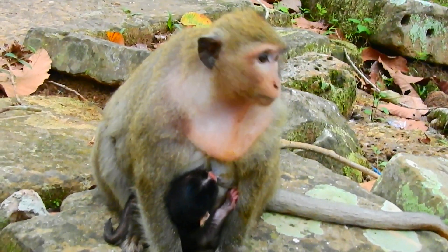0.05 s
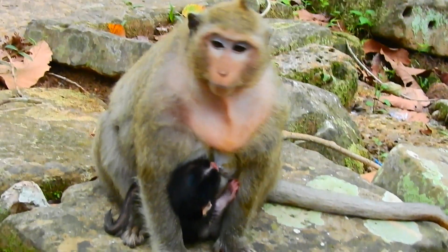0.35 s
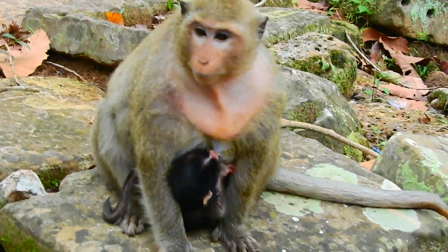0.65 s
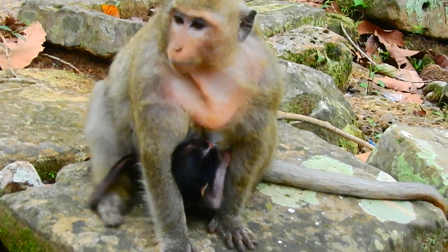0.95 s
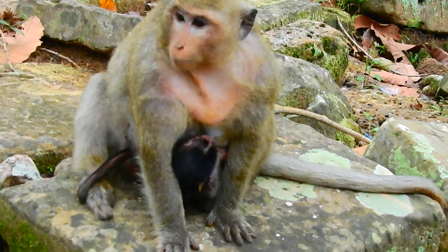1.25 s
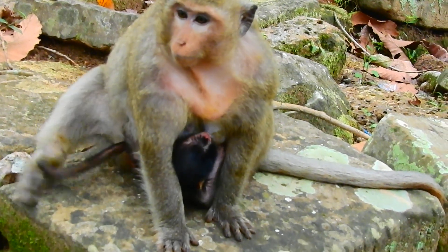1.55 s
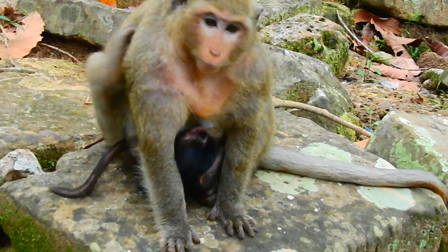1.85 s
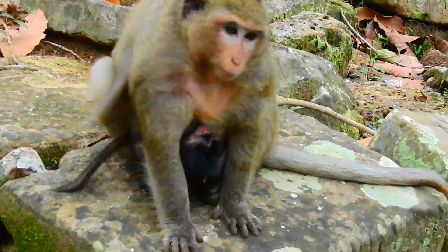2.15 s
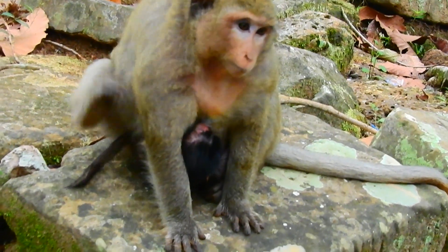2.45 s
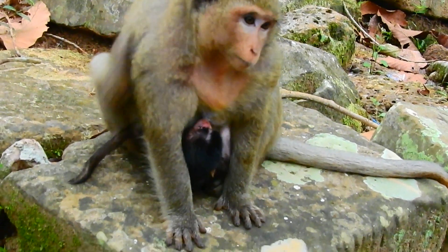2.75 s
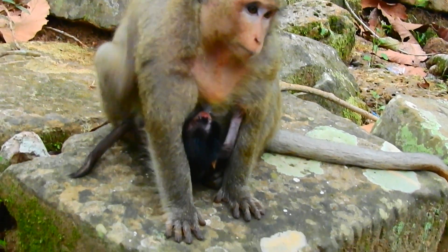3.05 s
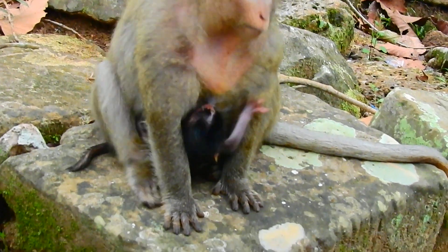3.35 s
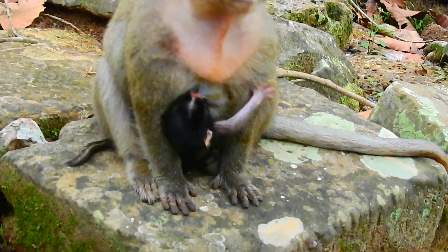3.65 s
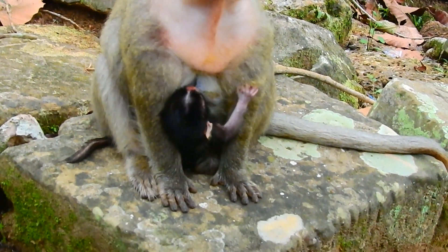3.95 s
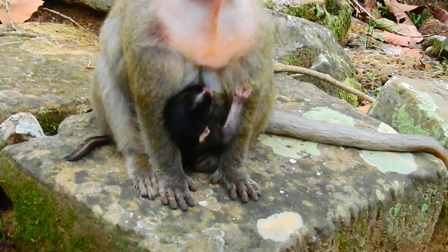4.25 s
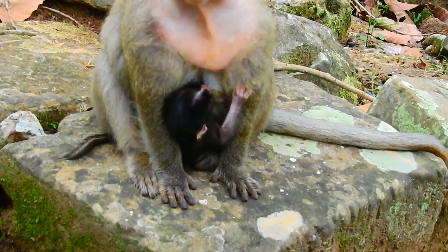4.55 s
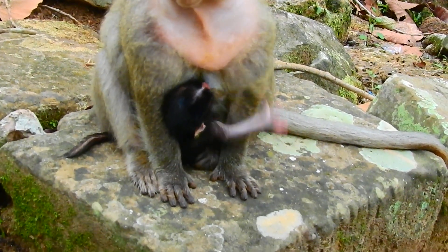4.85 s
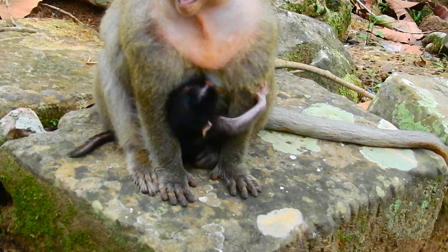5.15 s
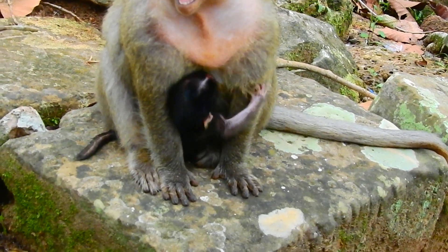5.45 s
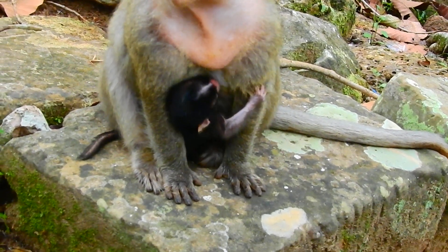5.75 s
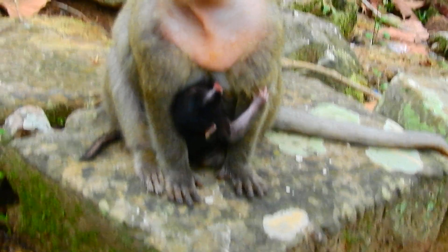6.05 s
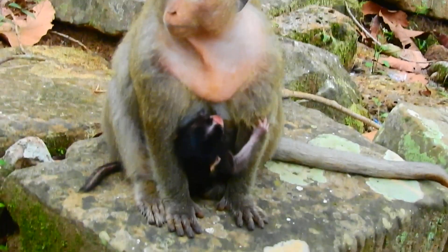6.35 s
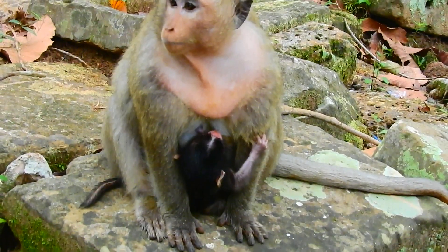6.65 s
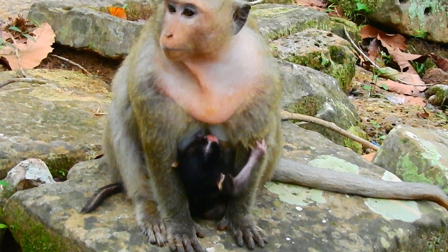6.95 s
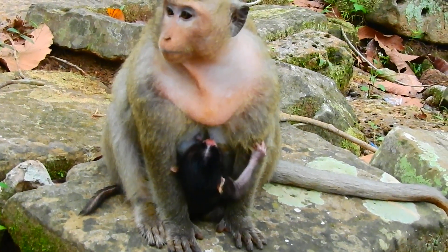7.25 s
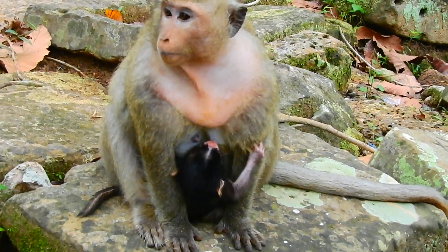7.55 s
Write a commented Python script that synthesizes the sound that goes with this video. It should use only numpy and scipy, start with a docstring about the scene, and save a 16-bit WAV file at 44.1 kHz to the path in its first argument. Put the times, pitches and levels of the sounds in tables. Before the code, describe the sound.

Close by, a baby macaque coos softly and then lets out a long, piercing scream that cracks in pitch and ends raspy. It coos again between a few dull thuds and scuffs of its mother's feet on stone, and finishes with one brief, rough squeak. All around is outdoor forest ambience: a constant high insect hiss, faint rumbling air and occasional thin whistles from a faraway bird.

```python
"""Forest air rumbles and insects hiss throughout; a far bird whistles and a mother macaque steps on rock.
At 4 s the baby in her arms coos softly through pursed lips. Near 5 s it gives one long shrill scream, which
breaks between registers and collapses into a rasp at 5.7 s; an automatic gain control ducks under it.
More coos, steps and whistles follow, and at 7.6 s a short harsh squeak comes through the wide-open mouth."""
import sys
import numpy as np
from scipy import signal
from scipy.fft import rfft, irfft, next_fast_len
from scipy.io import wavfile
from scipy.ndimage import minimum_filter1d, map_coordinates

SR = 44100
rng = np.random.default_rng(int(sys.argv[2]) if len(sys.argv) > 2 else 0)


def inscribe(sig):
    """Save sig as 16-bit PCM at rate SR to the path in sys.argv[1].

    A 1-D sig is mono; a 2-D sig holds one channel per row.
    Samples are clipped to [-1, 1] before scaling.
    """
    pcm = np.round(np.clip(np.atleast_2d(sig).T, -1, 1) * 32767)
    wavfile.write(sys.argv[1], SR, pcm.astype(np.int16))


N = 344850
TIME = np.arange(N) / SR

# Noise spectra of the background. Each row: frequency in Hz, relative spectral density in dB.
AIR_SPECTRUM = [(22, -44), (32, -35), (45, -9.5), (62, -6.5), (100, 2), (160, -2.5), (200, -9.5),
                (280, -15.5), (400, -29), (650, -26.5), (1300, -30.2), (1900, -29.2), (2500, -32),
                (4200, -87)]
FAR_CALLS_SPECTRUM = [(900, 4.5), (1800, -6), (2400, -0.5), (2800, 2), (3220, 8), (3650, -18.5),
                      (5000, -28.5)]  # faint distant calls near 3 kHz over a soft forest hush
INSECT_SPECTRUM = [(2060, -52.5), (3500, -10.5), (3700, -14.5), (4090, -2.5), (4430, -2.5), (4810, 3.5),
                   (5150, 1.5), (5510, -1.5), (5870, -8.5), (6280, -8), (6770, -14.5), (7910, -25),
                   (8580, -27.5), (10400, -35), (15500, -44)]
CRICKET_SPECTRUM = [(3900, -62), (4170, 0), (4280, 4), (4550, -60)]
# Slow drift of the insect chorus. Each row: time in seconds, level in dB.
CHORUS_LEVEL = [(0, -41.5), (2.3, -42), (2.8, -41), (3.8, -41), (4.4, -41.5), (6.2, -42), (7.0, -39.5),
                (7.8, -40.5)]
# Width of the background. Each row: frequency in Hz, side against mid in dB.
STEREO_WIDTH = [(60, -26), (150, -24), (380, -12.5), (950, -11), (2380, -10), (5980, -3.5), (15000, 3.5)]
# Reverberation of the forest. Each row: frequency in Hz, time to decay by 60 dB in seconds.
FOREST_DECAY = [(200, .35), (2200, 0.56), (5000, 0.59), (10000, 0.42), (15000, 0.19)]
# Level difference of the monkeys' sounds. Each row: frequency in Hz, left minus right in dB.
EAR_DIFFERENCE = [(1000, 0), (2200, .3), (5000, .3), (9000, -2), (13000, -.2)]
# The far bird's notes. Each row: start in seconds, hold in seconds, pitch in Hz, level in dB.
BIRD_NOTES = [(.2, .11, 2200, -52), (.47, .2, 2175, -49.5), (1.1, .22, 2100, -54), (1.42, .2, 2120, -53.5),
              (2.632, .06, 2212, -39), (2.855, .17, 2205, -37.5), (4.24, .39, 2205, -52.5),
              (4.7, .12, 2220, -48.5), (6.643, .36, 2190, -43.5), (6.873, .3, 2232, -40.5),
              (7.42, .18, 2244, -47)]
# The mother's steps, taps and scratches. Each row: start and length in seconds, thud and scuff in dB.
FOOTFALLS = [(.915, .06, -49, -41.5), (1.302, 0.057, -32.5, -56), (2.189, .08, -57, -54),
             (2.44, .05, -60, -56), (3.661, .024, -59, -41), (6.816, 0.0063, -45, -26.5),
             (6.863, 0.03, -24, -47), (7.053, 0.013, -40, -31.5), (7.568, 0.013, -57, -37.5)]
# Spectra of impact and friction on rock. Each row: frequency in Hz, relative level in dB.
THUD_SPECTRUM = [(60, -14), (150, -1.5), (280, 5), (450, -12), (1200, -58)]
SCUFF_SPECTRUM = [(300, -11), (800, 3.5), (1600, -2.5), (3000, -8.5), (6500, -22), (10000, -33),
                  (14000, -42)]
# Coos and peeps. Each row: start and length in seconds, pitch in Hz, glide as a share of the pitch,
# level in dB, overtone gain in dB.
COO_CALLS = [(4.012, .14, 557, 0, -42, -12), (4.569, .033, 554, .06, -23.5, -3),
             (4.588, .041, 587, .02, -19.5, -5.5), (4.663, .053, 523, 0, -31, -1),
             (4.739, .039, 3510, .027, -33, -14), (4.814, .02, 580, .11, -31, -7),
             (4.86, .014, 1223, .13, -34.5, -8), (5.52, .095, 3520, 0, -35, -14),
             (5.979, .088, 685, -.04, -41.5, 0), (6.559, .085, 685, -.023, -37.5, 0),
             (6.788, .043, 560, .22, -26, 1.5), (6.859, .085, 514, -.015, -30, 3.5),
             (7.634, .019, 3560, .09, -31.5, -14), (7.69, .013, 3220, -.01, -19, -11)]
# Spectral envelopes of the voice. Each row: frequency in Hz, relative level in dB.
PURSED_LIPS = [(1100, -22), (1700, -17), (2300, -30), (3100, -22.5), (4000, -32), (6900, -12.5),
               (9300, -33.5), (11500, -52), (15000, -68)]
OPEN_MOUTH = [(450, -34), (900, -24.5), (2100, -10.5), (2700, -6), (3300, -5), (4700, -4), (5500, 5),
              (6700, 2.5), (8000, -11.5), (9700, -21), (12000, -32.5), (15500, -48)]
SCREAM_OVERTONES = [(7400, 2), (8300, -9.5), (8900, -6.5), (9250, -12), (9550, -23.5), (10600, -25),
                    (11800, -39), (13300, -29), (14300, -44), (15800, -46)]
SCREAM_HALF_ORDERS = [(6300, 18.5), (6900, -13), (7900, -3), (11000, -24), (14000, -34)]
SCREAM_RASP = [(500, -47), (1700, -25), (2200, -4.5), (2800, -16), (3700, -20), (4500, -10), (5500, 5),
               (6600, 3.5), (7800, -5), (9200, -13), (11000, -15.5), (13500, -24), (15500, -39)]
SCREAM_SQUEAL = [(4600, -40), (5400, 0), (5900, 0), (6600, -12), (7600, -36)]
# The squeak's two pushes. Each row: peak and hold in seconds, level in dB, rise and fall in dB a second.
SQUEAK_PUSHES = [(7.684, .026, -14.5, 430, 1400), (7.735, .006, -23, 300, 550)]
# The whistle over the squeak. Each row: time in seconds, pitch in Hz.
SQUEAK_ARCH = [(7.646, 940), (7.662, 1060), (7.666, 1540), (7.674, 1590), (7.701, 2250), (7.719, 1420)]
# The scream's upper register. Each row: time in seconds, pitch in Hz, effort in dB.
SCREAM_ARCH = [(4.928, 3680, -34), (4.98, 4770, -19.5), (5.03, 4950, -7.5), (5.052, 4830, -3),
               (5.088, 5060, -2), (5.155, 4690, -2.5), (5.187, 4900, -4), (5.335, 4560, -8),
               (5.417, 4740, -7), (5.43, 5250, 1), (5.485, 5540, 2), (5.56, 5590, 1.5), (5.63, 5150, -1),
               (5.685, 4730, -3), (5.7, 4450, -8)]
# Breaks to the lower register. Each row: start and length in seconds, drop as a share of the pitch,
# recovery rate per second, half-order gain in dB.
REGISTER_BREAKS = [(4.995, .033, .11, 9, 0), (5.057, .023, .125, 6, 4), (5.096, .028, .135, 16, -5),
                   (5.207, .025, .07, 16, -35), (5.25, .043, .073, 9, -7), (5.39, .031, .068, 12, -10),
                   (5.452, .03, .085, 42, -35), (5.494, .037, .07, 8, -15), (5.552, .023, .075, 45, -30),
                   (5.59, .03, .055, 35, -12)]
# Bursts of strain in the scream. Each row: centre and half width in seconds, rasp level in dB.
STRAIN_BURSTS = [(5.008, .013, -28), (5.052, .005, -21), (5.201, .008, -23), (5.255, .01, -22),
                 (5.317, .01, -27), (5.378, .015, -18), (5.417, .006, -24), (5.496, .008, -15),
                 (5.604, .017, -10)]

TOP_HZ = 15720  # upper band limit


def amp(db):
    """Decibels as an amplitude ratio."""
    return 10 ** (np.asarray(db) / 20)


def unit(x):
    """Normalisation to an rms of 1."""
    return x / np.sqrt(np.mean(x ** 2) + 1e-20)


def along(points, hz):
    """Interpolation of (Hz, value) points on a logarithmic frequency axis."""
    freqs, values = np.transpose(points)
    return np.interp(np.log(hz + 1), np.log(freqs + 1), values)


def curves(rows, t):
    """Linear interpolation of each column after the time, at the times t."""
    times, *columns = np.transpose(rows)
    return [np.interp(t, times, column) for column in columns]


def span(start, end):
    """The sample times between two moments."""
    return TIME[int(start * SR):int(end * SR)]


def add(track, t, x):
    """Superposition of x on the track at the times t."""
    track[round(t[0] * SR):][:len(x)] += x


def gate(t, start, end, edge):
    """A trapezoidal window from start to end."""
    return np.clip((t - start) / edge + .5, 0, 1) * np.clip((end - t) / edge + .5, 0, 1)


def envelope_db(t, peak, held, db, rise, fall):
    """Exponential attack and release around a hold; rise and fall are in dB a second."""
    return db - rise * np.maximum(peak - t, 0) - fall * np.maximum(t - peak - held, 0)


def wobble(t, rate):
    """Random modulation: a spline through rate Gaussian knots a second."""
    knots = (t - t[0]) * rate
    return map_coordinates(rng.standard_normal(int(knots[-1]) + 4), [knots])


def phase_of(hz):
    """Phase in radians, the integral of frequency."""
    return 2 * np.pi * np.cumsum(hz) / SR


def filtered(x, response):
    """Linear filtering: the spectrum of x times a frequency response."""
    n = x.shape[-1]
    padded = next_fast_len(n + 8192)
    return irfft(rfft(x, padded) * response(np.fft.rfftfreq(padded, 1 / SR)), padded)[..., :n]


def smoothed(x, time_constant_s):
    """Exponential averaging by a one-pole low-pass."""
    pole = np.exp(-1 / (time_constant_s * SR))
    return signal.lfilter([1 - pole], [1, -pole], x)


def noise(t, spectrum):
    """White noise shaped to a spectrum, with an rms of 1."""
    return unit(filtered(rng.standard_normal(len(t)), lambda hz: amp(along(spectrum, hz))))


def diffuse(spectrum):
    """A diffuse field: noise that is coherent between the ears in the bass and less so above."""
    mid = noise(TIME, spectrum)
    side = filtered(noise(TIME, spectrum), lambda hz: amp(along(STEREO_WIDTH, hz)))
    return np.array([mid + side, mid - side])


def background():
    """Amplitude-modulated noise: rumbling air, faint distant calls, an insect chorus, a nearer cricket."""
    rumble = amp(-35.0 + 0.64 * wobble(TIME, 8.2)) * diffuse(AIR_SPECTRUM)
    far_calls = amp(-52.5 + 1.05 * wobble(TIME, 6)) * diffuse(FAR_CALLS_SPECTRUM)
    chorus_db, = curves(CHORUS_LEVEL, TIME)
    insects = amp(chorus_db + 0.46 * wobble(TIME, 11)) * diffuse(INSECT_SPECTRUM)
    cricket = amp(-55.5 + 4.3 * wobble(TIME, 14)) * diffuse(CRICKET_SPECTRUM)
    return rumble + far_calls + insects + cricket


def forest_reverb(x):
    """Scattering from rocks and trunks: convolution with an exponentially decaying noise tail."""
    hz, t, spectra = signal.stft(rng.standard_normal((2, SR * 3 // 4)), SR, nperseg=256)
    decay = amp(-60 * t / along(FOREST_DECAY, hz)[:, None])
    mid, side = signal.istft(spectra * decay, SR, nperseg=256)[1]
    tail = np.array([mid + 0.53 * side, mid - 0.15 * side]) / np.linalg.norm(mid)
    return signal.fftconvolve(x[None], tail, axes=1)[:, :N]


def bird():
    """Multipath propagation: trees smear each far whistle, differently at each ear, and prolong it."""
    out = np.zeros((2, N))
    ring_t60_s = 1.34
    for start, held, pitch, db in BIRD_NOTES:
        t = span(start, start + held + 1)
        age = t - t[0]
        flick = np.exp(-(age / 0.014) ** 2)  # the pitch drops onto its note
        phase = phase_of(pitch * (1 + flick * (0.08 + 0.09 * wobble(t, 1200)) + 0.0041 * wobble(t, 18)))
        rise_s = max(.006 * amp(-1.7 * (db + 40)), .001)  # faint notes arrive as echoes and swell slowly
        level = amp(db + 2.4 * wobble(t, 26) - 60 * np.maximum(age - held, 0) / ring_t60_s)
        level *= 1 - np.exp(-age / rise_s)
        smeared = lambda k: wobble(t, 45) * np.sin(k * phase) + wobble(t, 44.8) * np.cos(k * phase)
        octave = gate(age, 0.024, .2, .05) * amp(db + 33)  # strongest early in loud notes
        mid = 0.88 * np.sin(phase) + 0.55 * smeared(0.98)
        mid += octave * smeared(2) + amp(-26.5) * smeared(3.47)
        side = amp(-9) * smeared(0.95)
        add(out[0], t, amp(1.2) * level * (mid + side))
        add(out[1], t, amp(2.6) * level * (mid - side))
    return out


def steps():
    """Impact and friction: soft feet on rock give a dull thud and a gritty scuff that die quickly."""
    out = np.zeros(N)
    for start, length, thud_db, scuff_db in FOOTFALLS:
        t = span(start, start + .15)
        age = t - t[0]
        envelope = 2 * np.exp(-2 * age / length) * (1 - np.exp(-age / (length / 7)))
        grit = amp(2.3 * wobble(t, 300))
        thud = amp(thud_db) * noise(t, THUD_SPECTRUM)
        scuff = amp(scuff_db) * grit * noise(t, SCUFF_SPECTRUM)
        add(out, t, envelope * (thud + scuff))
    return out


def coos():
    """Source and filter: pursed lips weaken the harmonics, leaving short, nearly pure arched calls."""
    out = np.zeros(N)
    for start, length, pitch, glide, db, overtone_db in COO_CALLS:
        t = span(start, start + length)
        position = np.linspace(-1, 1, len(t))
        arch_hz = 470 * length * (1 / 3 - position ** 2)  # longer coos arch higher
        phase = phase_of(pitch * (1 + glide * position / 2) + arch_hz + 7 * wobble(t, 280))
        overtones = sum(amp(along(PURSED_LIPS, k * pitch)) * np.sin(k * phase)
                        for k in range(2, 8) if k * pitch < TOP_HZ)
        husk = amp(-25 + .55 * (db + 30)) * noise(t, PURSED_LIPS)  # louder coos are huskier
        swell = np.tanh((1 - np.abs(position)) * length * pitch / 14)  # higher coos start faster
        level = np.sqrt(2) * amp(db + 1.05 * wobble(t, 90)) * swell
        add(out, t, level * (np.sin(phase) + amp(overtone_db) * overtones + husk))
    return out


def vocal_whistle(t, pitch, level_db, scatter, octave_db):
    """Random modulation broadens a tone and its octave into a croak; scatter is a share of the pitch."""
    phase = phase_of(pitch * (1 + scatter * wobble(t, 1400)))
    level = np.sqrt(2) * amp(level_db - 1.5 + 15 * scatter * wobble(t, 563))
    return level * (np.sin(phase) + amp(octave_db) * np.sin(2 * phase))


def squeak():
    """Loss of periodicity: voice pulses quicken with effort and turn to rasp under an arching whistle."""
    t = span(7.627, 7.775)
    effort_db = np.max([envelope_db(t, *push) for push in SQUEAK_PUSHES], axis=0)
    relative_db = effort_db - effort_db.max()
    pulse_hz = 1150 + 16.5 * relative_db
    roughness = np.clip(.27 + 10 * np.maximum(t - 7.672, 0), 0, .9)
    phase = phase_of(pulse_hz * (1 + 0.043 * roughness * wobble(t, 914)))
    pulses = unit(sum(amp(along(OPEN_MOUTH, k * pulse_hz)) * np.sin(k * phase + rng.uniform(0, 2 * np.pi))
                      for k in range(1, 14)))
    breath = unit(noise(t, OPEN_MOUTH) * (1 + .5 * np.cos(phase)))
    buzz = amp(effort_db + 2.5) * (amp(2.5) * (1 - roughness) * pulses + np.sqrt(roughness) * breath)
    pitch, = curves(SQUEAK_ARCH, t)
    locked = gate(t, 7.6645, 7.674, .003)  # the whistle briefly steadies and rings out
    whistle_db = -21.5 + .42 * relative_db + 13 * locked
    whistle_db -= 750 * np.maximum(t - 7.705, 0)  # it dies as the voice roughens
    whistle = vocal_whistle(t, pitch, whistle_db, scatter=.11 - .08 * locked, octave_db=-18)
    out = np.zeros(N)
    add(out, t, buzz * gate(t, t[0] + .014, t[-1] - .008, .016))
    add(out, t, whistle * gate(t, t[0] + .012, t[-1], .024))
    return out


def collapse():
    """Chaotic vibration: the scream turns to rasp and its energy sinks to the octave below."""
    start_s, length_s, sink_s = 5.689, .125, .046
    t = span(start_s, start_s + length_s)
    pitch = 2230 - 790 * np.minimum((t - t[0]) / sink_s, 1) ** 4.5
    octave_db = np.interp(t, [5.714, 5.722], [4, -22])
    whistle_db = envelope_db(t, peak=5.717, held=.007, db=-3.5, rise=800, fall=1600)
    whistle = vocal_whistle(t, pitch, whistle_db, scatter=0.055, octave_db=octave_db)
    rasp_db = envelope_db(t, peak=5.7, held=.009, db=-11, rise=1400, fall=200)
    rasp = amp(rasp_db + 1.7 * wobble(t, 393.4)) * noise(t, OPEN_MOUTH)
    out = np.zeros(N)
    add(out, t, whistle + rasp)
    return out


def register_breaks(t):
    """Bifurcation: the voice drops in register, may double its period, and jumps back with a surge."""
    edge_s, surge_s, doubling_fade_db_per_s = .005, .007, 330
    drop = doubling = surge = 0
    for start, length, share, recovery, half_db in REGISTER_BREAKS:
        broken = gate(t, start, start + length, edge_s)
        age = np.maximum(t - start, 0)
        drop += broken * share * np.exp(-recovery * age)
        doubling += broken * amp(half_db - doubling_fade_db_per_s * age)
        surge += np.exp(-((t - start - length - surge_s / 2) / surge_s) ** 2)
    return drop, doubling, surge


def scream():
    """Nonlinear phonation: a shrill arch breaks to a weaker register and, strained, shakes and rasps."""
    calm_rasp_db, ceiling_hz, ceiling_width_hz = -30, 5450, 70
    t = span(SCREAM_ARCH[0][0], SCREAM_ARCH[-1][0] + 0.0035)
    arch_hz, effort_db = curves(SCREAM_ARCH, t)
    drop, doubling, surge = register_breaks(t)
    pitch = arch_hz * (1 - drop)
    tone_gain = amp(effort_db - 68 * drop + 2.5 * surge)
    bursts = sum(amp(db) * np.exp(-((t - centre) / width) ** 2) for centre, width, db in STRAIN_BURSTS)
    rasp_gain = amp(effort_db + calm_rasp_db) + bursts
    strain = np.clip(rasp_gain / tone_gain, 0, .19)
    phase = phase_of(pitch * (1 + 0.004 * wobble(t, 110) + 0.088 * strain * wobble(t, 1300)))
    flutter_db = 1.2 + 5.8 * strain
    overtones = sum(amp(along(SCREAM_OVERTONES, k * pitch) + flutter_db * wobble(t, 800))
                    * np.sin(k * phase + 0.17 * wobble(t, 1500)) for k in (2, 3))
    half_orders = sum(amp(along(SCREAM_HALF_ORDERS, k * pitch / 2))
                      * np.sin(k * phase / 2 + 0.72 * wobble(t, 900)) for k in (3, 5))
    # the half orders take their energy from the main tone
    tone = (np.sin(phase) + doubling * half_orders) / np.sqrt(1 + doubling ** 2)
    brightness = amp(np.interp(effort_db, [-14, -6], [-4, 0]))  # a softer voice has weaker overtones
    tone += overtones * brightness / np.sqrt(1 + doubling)
    # near its highest pitch the voice frays into a squeal
    fraying = (1 + np.tanh((pitch - ceiling_hz) / ceiling_width_hz)) / 2
    tone += amp(-11) * fraying * noise(t, SCREAM_SQUEAL)
    shake = amp((0.1 + 11.2 * strain) * wobble(t, 600) + 1.1 * wobble(t, 110))
    rasp = rasp_gain * amp(-2.5 + 2.2 * wobble(t, 300)) * noise(t, SCREAM_RASP)
    voice = np.sqrt(2) * tone_gain * shake * tone + rasp
    out = np.zeros(N)
    add(out, t, voice * gate(t, t[0] + .002, t[-1] - .002, 0.0092))
    return out


def paths_to_ears(hz):
    """Interference of the direct sound with one faint reflection from the rock face, at each ear."""
    interaural_s, echo_s = 0.8e-5, np.array([[.0011], [.0016]])
    direct = np.exp(1j * np.pi * hz * interaural_s * np.array([[1], [-1]]))
    echo = amp(-20.5) * np.exp(-2j * np.pi * hz * echo_s)
    balance = amp(along(EAR_DIFFERENCE, hz) * np.array([[.5], [-.5]]))
    return balance * (direct + echo)


def scene():
    """Superposition of the monkeys close in front, their reverberation, the bird and the background."""
    monkeys = scream() + collapse() + squeak() + coos() + steps()
    mix = filtered(monkeys, paths_to_ears) + amp(-21) * forest_reverb(monkeys) + bird() + background()
    return mix * amp([[-.2], [.2]])


def record(dry):
    """Automatic gain control lags, so sudden rises overshoot; soft clipping and a band limit follow."""
    power = smoothed(np.mean(dry ** 2, axis=0), time_constant_s=0.0034)
    needed_gain = np.minimum(1, amp(-9.5) / np.sqrt(np.abs(power) + 1e-12))
    held_gain = minimum_filter1d(needed_gain, size=601, origin=300)  # lowest of the last 14 ms
    ducked = dry * (1 - smoothed(1 - held_gain, time_constant_s=0.001))
    rounded = ducked / (1 + np.abs(ducked / .95) ** 10) ** .1
    return filtered(rounded, lambda hz: hz < TOP_HZ)


dry = scene()
out = record(dry)
inscribe(out)
```